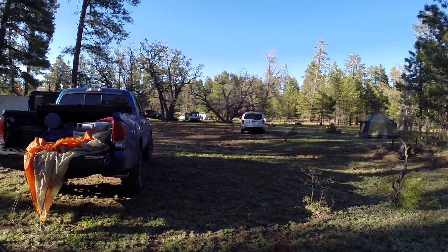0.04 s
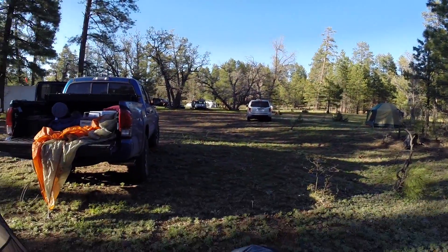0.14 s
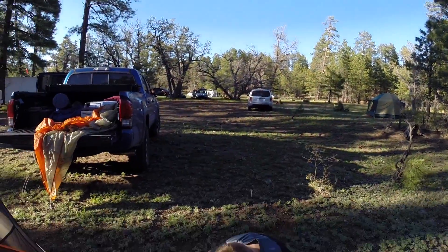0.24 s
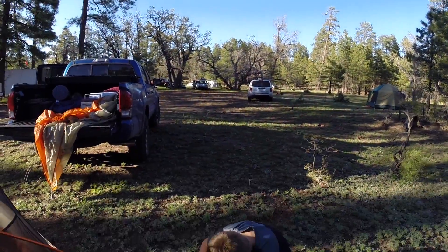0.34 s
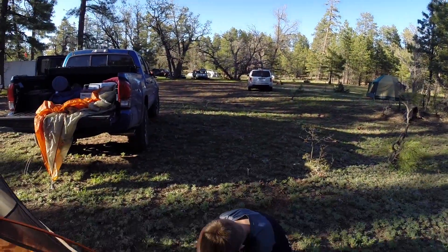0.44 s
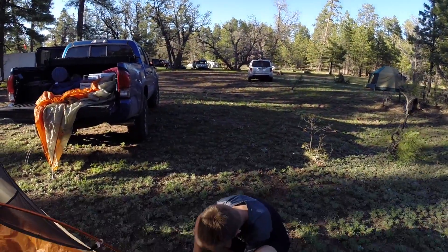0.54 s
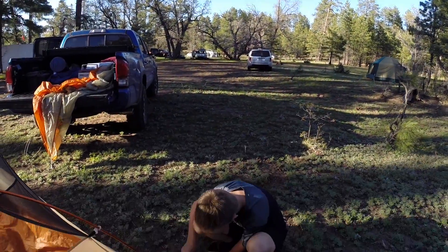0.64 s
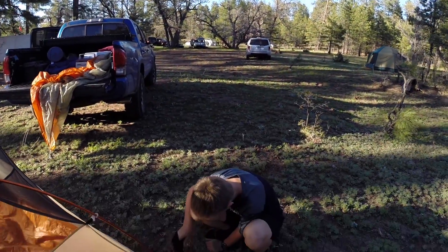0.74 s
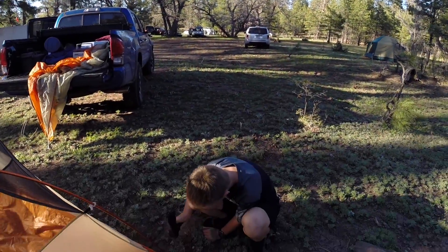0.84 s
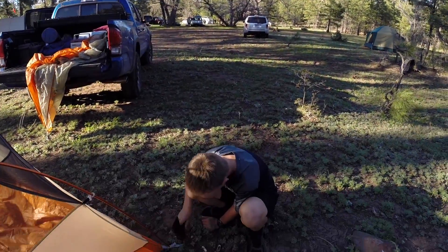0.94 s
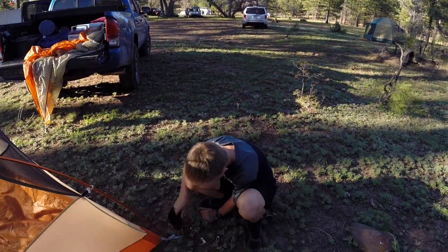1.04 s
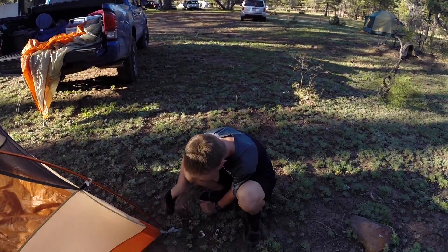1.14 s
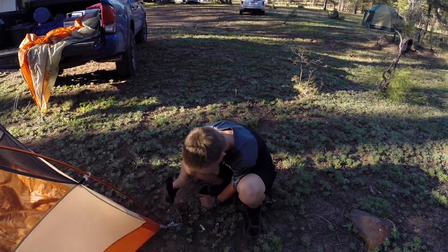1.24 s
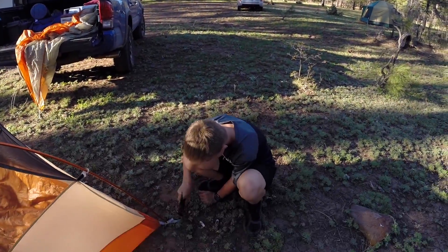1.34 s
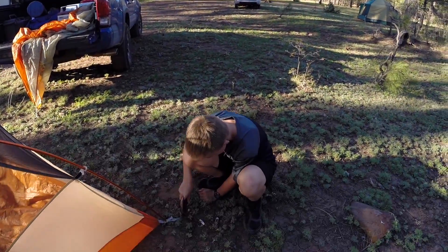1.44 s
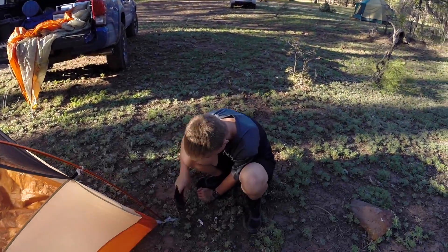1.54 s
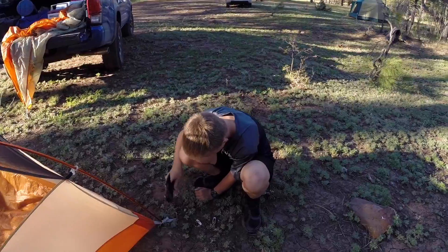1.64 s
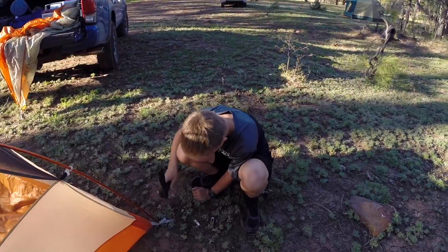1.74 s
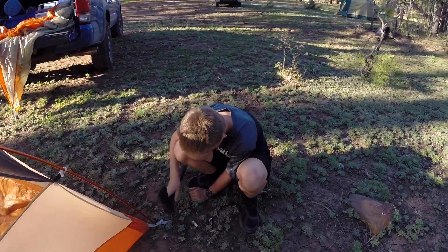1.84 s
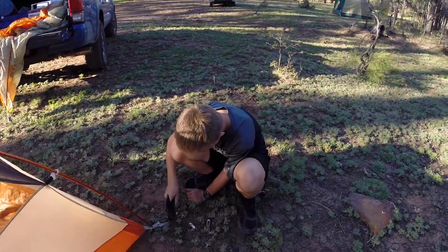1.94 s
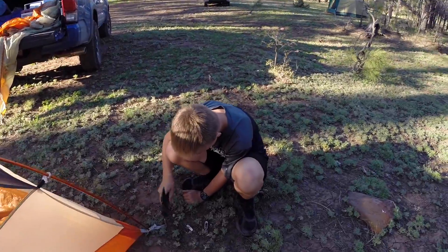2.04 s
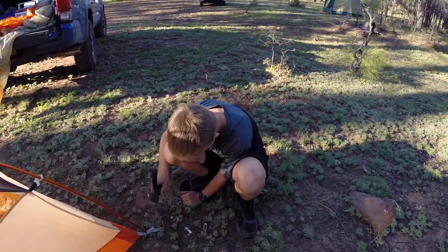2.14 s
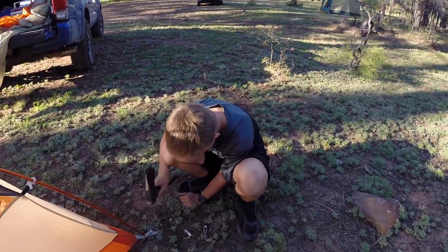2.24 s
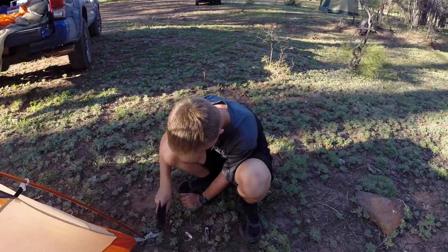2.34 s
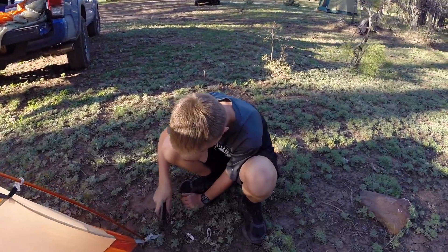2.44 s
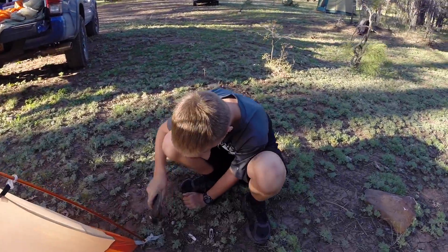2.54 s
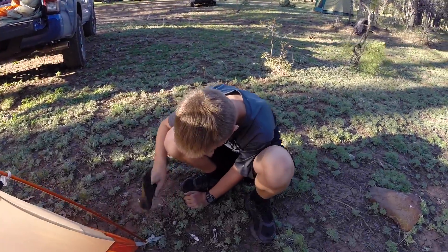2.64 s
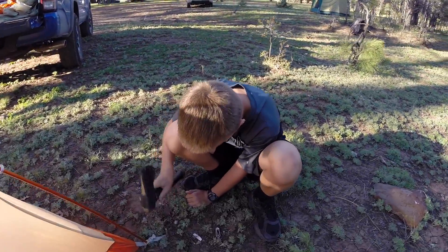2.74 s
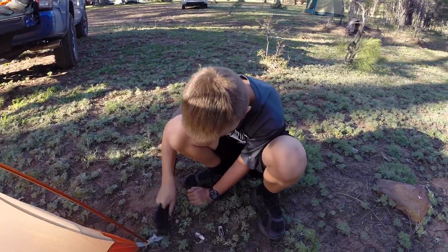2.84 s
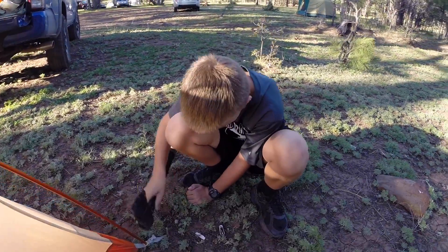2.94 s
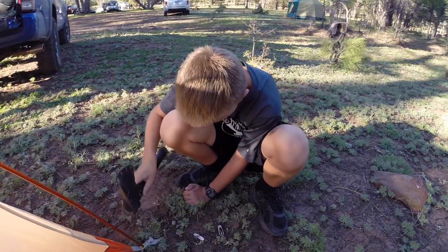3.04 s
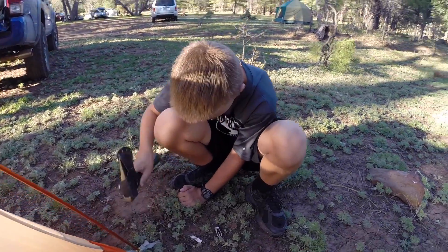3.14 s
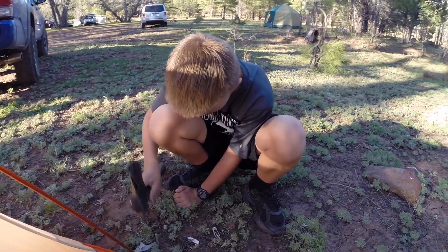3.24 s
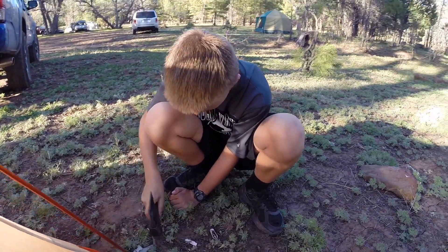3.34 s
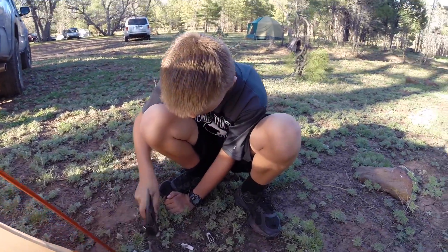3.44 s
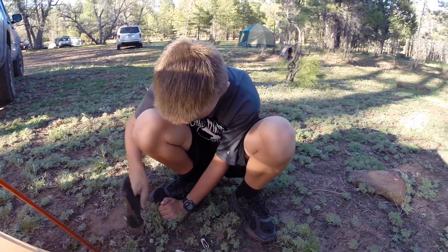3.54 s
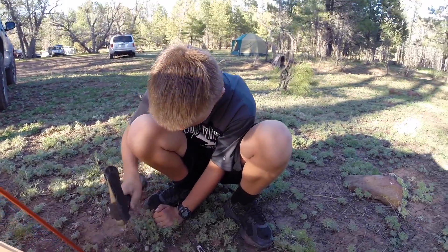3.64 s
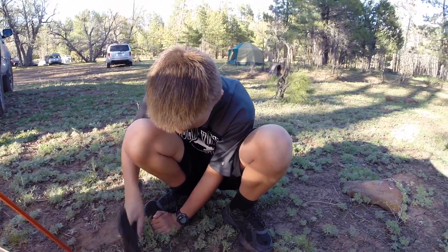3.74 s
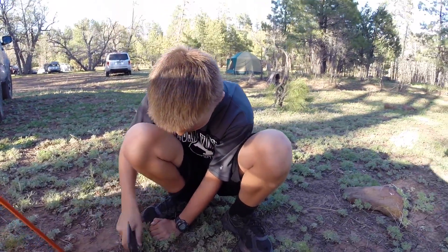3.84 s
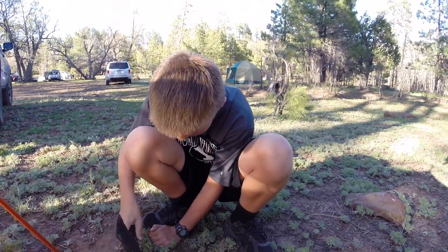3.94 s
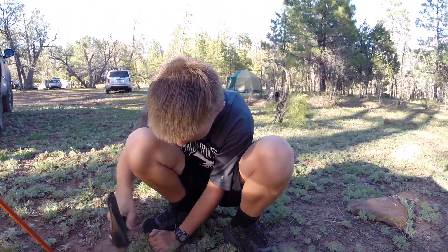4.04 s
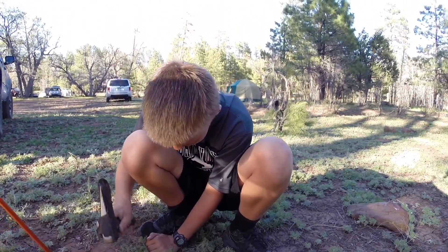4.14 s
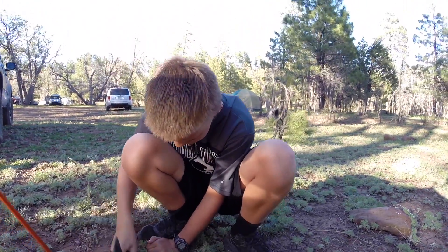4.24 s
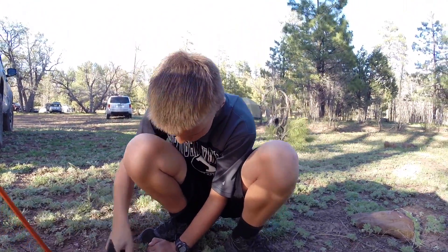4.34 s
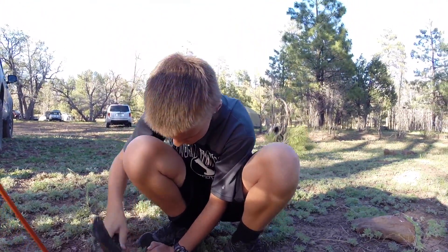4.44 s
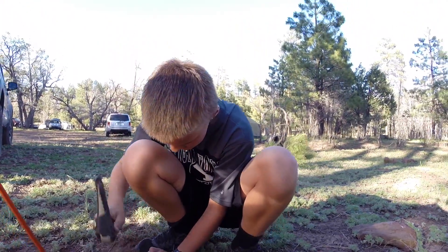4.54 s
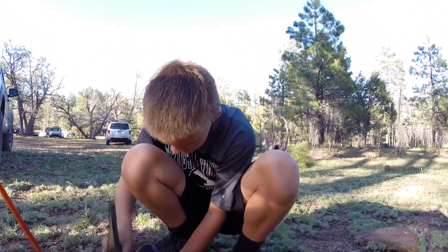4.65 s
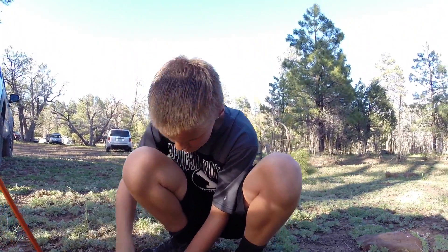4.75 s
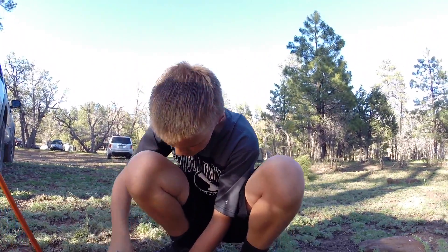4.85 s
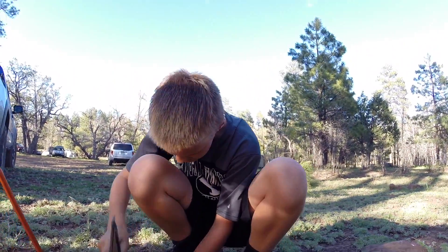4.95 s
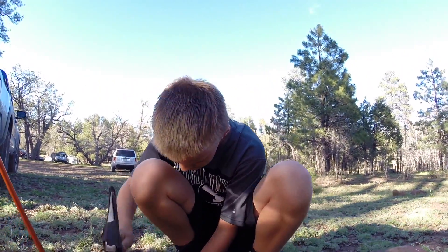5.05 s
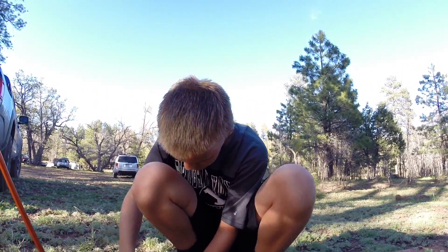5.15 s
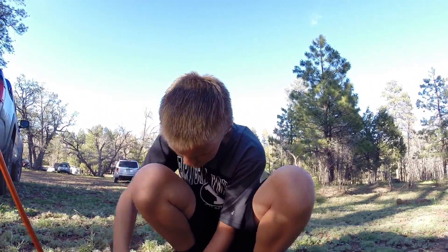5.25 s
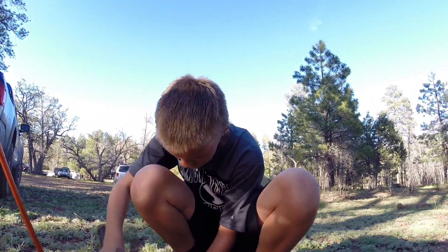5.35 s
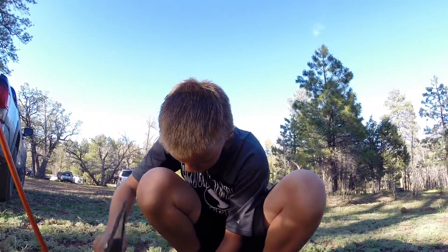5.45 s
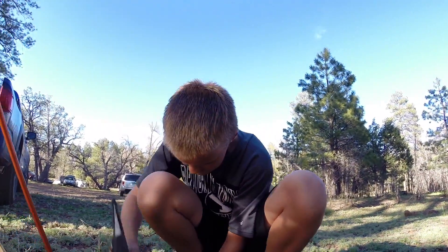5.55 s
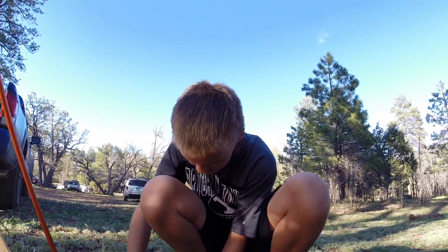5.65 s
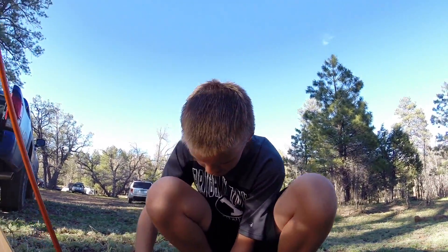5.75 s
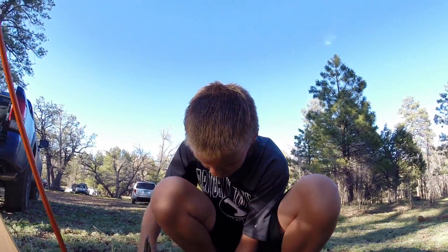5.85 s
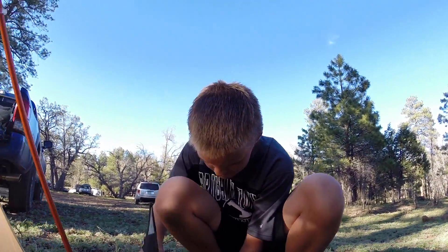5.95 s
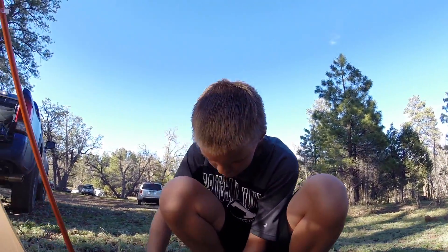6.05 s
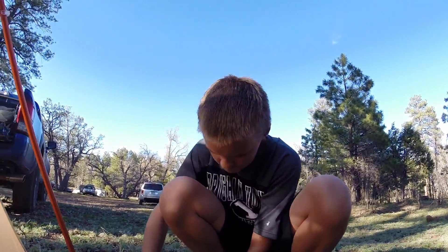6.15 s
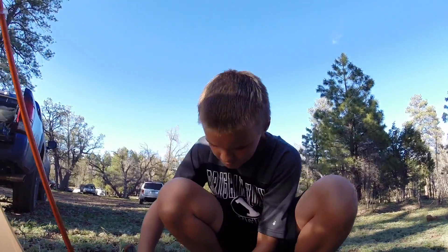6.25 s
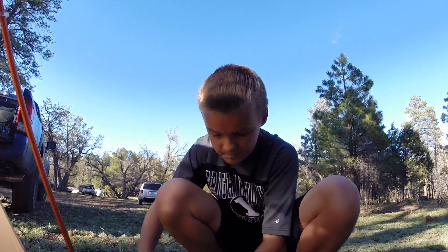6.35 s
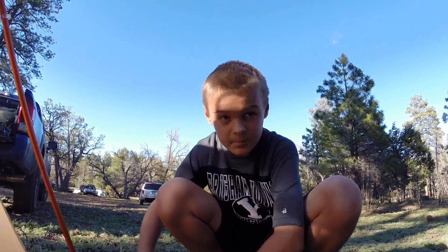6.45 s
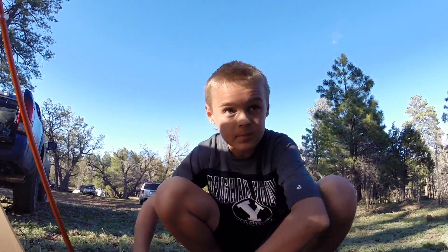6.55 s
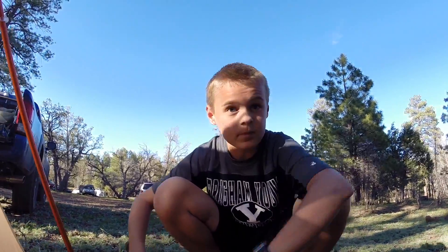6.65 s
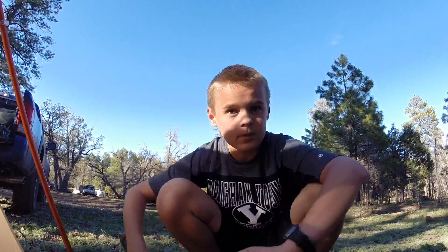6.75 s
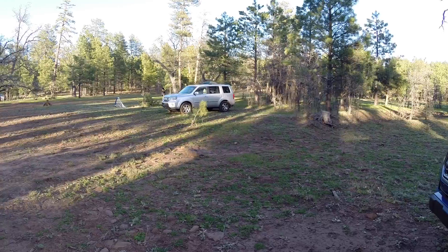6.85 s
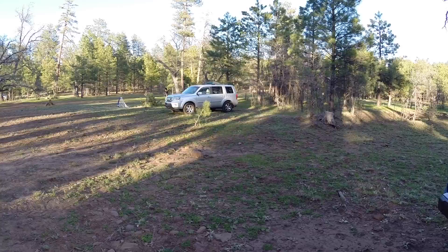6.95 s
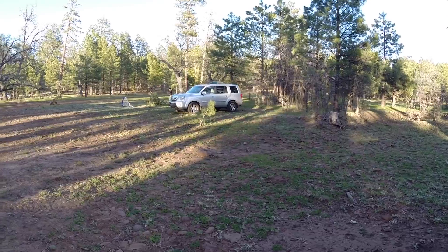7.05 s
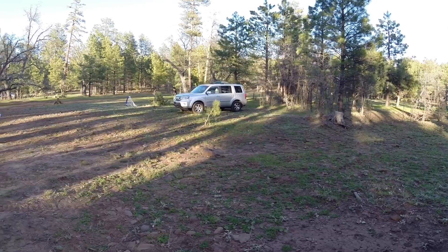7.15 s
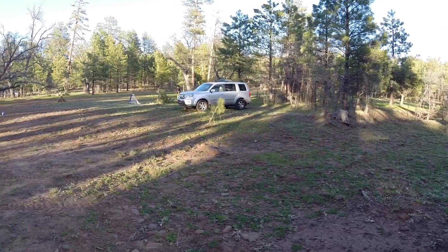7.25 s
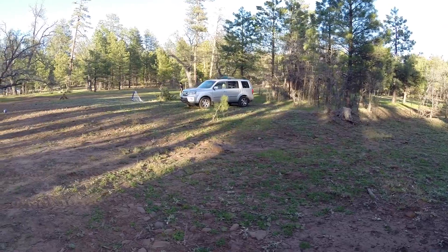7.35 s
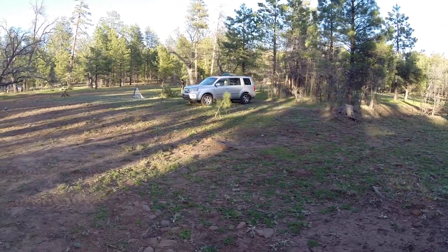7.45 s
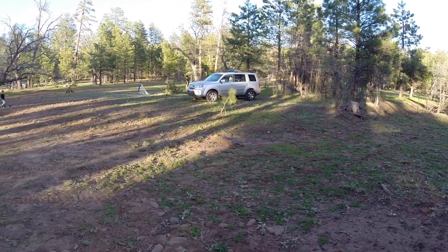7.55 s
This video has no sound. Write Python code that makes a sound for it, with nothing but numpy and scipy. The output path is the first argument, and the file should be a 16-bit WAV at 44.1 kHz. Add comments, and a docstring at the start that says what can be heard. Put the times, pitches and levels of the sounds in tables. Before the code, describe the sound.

Close to the microphone, a steel hatchet head taps a metal tent stake into hard ground about twice a second, then more slowly and harder. Each hit is a short bright clink choked by soil, with grit and a low thud. Pebbles click and feet scuff between blows. Two blows crunch in gravel. The sound almost vanishes for an instant, then dull bumps and faint bird twitters follow in open forest air.

```python
"""A metal tent stake is hammered into hard ground with the back of a hatchet at a forest campsite.
Each blow is a short clink of dying tones, choked by the soil, over crackling noise and a low thud.
Some blows bounce, and two land in the gravel as bursts of noise. Shaped noise makes the feet shuffling
on dirt, the clicking pebbles and the air in the trees; gliding pure tones make the far birds.
Late on, the sound nearly vanishes for an instant; dull bumps of low, dying tones follow."""
import sys
import numpy as np
from scipy import signal
from scipy.fft import rfft, irfft
from scipy.io import wavfile
from scipy.ndimage import uniform_filter1d

SR = 44100
rng = np.random.default_rng(int(sys.argv[2]) if len(sys.argv) > 2 else 0)


def to_wav(s):
    """Save 16-bit WAV."""
    ch = np.atleast_2d(s).T  # columns
    pcm = np.round(np.clip(ch, -1, 1) * 32767)  # PCM
    wavfile.write(sys.argv[1], SR, pcm.astype(np.int16))


N = 335160
T = np.arange(SR // 3) / SR  # time since a short sound began [s]

# blows on the stake, generally growing stronger;
# strength, stake tone and tick columns, all in dB, adjust the part levels
# (time [s], strength [dB], soil knock pitch [Hz], lowest stake tone [dB], upper stake tones [dB],
#  centre of the upper tones [Hz], contact tick [dB])
STAKE_BLOWS = [(0.0775, -9, 245, -5.5, -4, 5800, -1.5), (0.4194, -8, 264, -23, -15, 6300, -6),
               (0.7568, -8.5, 267, -8.5, 0.5, 5240, 0), (1.1526, -8, 259, 2, 7, 5370, 5.5),
               (1.5373, -8, 198, -13, -3, 3950, 2), (2.0661, -3.5, 233, -2.5, -3, 5270, -6.5),
               (2.539, -2.5, 207, -19, -13, 6300, 0), (3.5052, -1, 212, 1, -3.5, 4330, 3),
               (3.9666, 0, 224, -1, -0.5, 5000, -0.5), (4.4424, -1.5, 267, 4.5, 0.5, 4870, 1),
               (4.8953, 0, 209, -4.5, -3, 4700, -2), (5.3574, 0.5, 214, -7, -3, 4220, 1.5),
               (5.8307, 1.5, 230, -13.5, -12.5, 4280, -0.5)]
# blows that land in the gravel
# (time [s], soil thump [dB], crunch [dB], crunch pitch [Hz], lowest stake tone [dB])
GRAVEL_BLOWS = [(3.0154, -42.5, -36.5, 1890, -61.5), (6.2678, -20, -30, 927, -33.5)]
# the hatchet drops back after a blow (time [s], soil knock [dB], grit [dB], lowest stake tone [dB])
HATCHET_BOUNCES = [(1.5726, -43, -46, -65), (4.4999, -30.5, -42.5, -48), (4.9841, -35, -47, -77),
                   (5.4029, -30, -41, -76)]
# the clearest clicks: pebbles, and the hatchet rattling at the top of its backswing # about 0.11 s before the
# blows at 4.90, 5.36 and 6.27 s (time [s], level [dB], pitch [Hz])
CLEAR_CLICKS = [(1.0808, -64, 4300), (1.914, -56, 1490), (2.1248, -48.5, 885), (2.1575, -53.5, 990),
                (2.233, -55, 1140), (2.3498, -49, 990), (2.4126, -52.5, 902), (4.0912, -56.5, 2080),
                (4.783, -50.5, 1900), (5.2508, -43.5, 1910), (5.882, -55, 990), (6.1595, -45.5, 1960),
                (6.4418, -54.5, 1430), (6.53, -60.5, 3000)]
# scuffs of shoes, clothes and hatchet on the dirt; t60 is the time to fade by 60 dB
# (time [s], level before flutter [dB], rise [s], t60 [s], centre [Hz], width [octaves])
DIRT_SCUFFS = [(2.31, -52, 0.011, 0.66, 870, 0.83), (2.782, -42.5, 0.0054, 0.23, 870, 1.2),
               (2.798, -58.5, 0.026, 1, 2350, 1.3), (3.06, -54, 0.036, 0.37, 800, 0.89),
               (6.372, -52, 0.0051, 0.16, 9260, .08), (6.376, -50.5, 0.0021, 0.22, 2780, 4.4),
               (6.768, -51.5, 0.033, 0.15, 4640, 0.33), (6.765, -50, 0.028, 0.2, 1850, 2.5),
               (7.15, -61, 0.065, 0.62, 700, 1.5)]
# ringing tones of the stake before the soil grips it, lowest first (pitch [Hz], relative level [dB], t60 [s])
STAKE_TONES = [(3467, 0, 0.023), (4000, 5, 0.0091), (4253, 3.5, 0.0065), (4610, -8, 0.008),
               (5030, -1.5, 0.012), (5420, 1, 0.0061), (5980, 3, 0.011), (6090, -20, 0.0053),
               (8150, 12, 0.015)]
# soil under the stake (pitch [Hz], relative level [dB], t60 [s])
SOIL_THUMP = [(47.5, -19, 0.45), (117.8, 2.5, 0.035)]
# soil under the hatchet's head (pitch [Hz], relative level [dB], t60 [s])
HEAD_THUMP = [(52.7, -20, 0.098), (124, 4.5, 0.029), (160, 1.5, 0.033), (243, -6, 0.042), (380, -10, 0.032)]
# colour of the grit around the shaft (frequency [Hz], relative level per Hz [dB])
GRIT_COLOUR = [(150, 1), (330, 5.5), (420, 6.5), (560, 8), (780, 4.5), (1030, 3), (1500, -2.5), (2400, -12),
               (6000, -14), (15000, -49)]
# colour of softer grit (frequency [Hz], relative level per Hz [dB])
SOFT_GRIT_COLOUR = [(100, 2.5), (600, 8), (1200, -7), (2200, -5), (4000, -21), (8000, -31.5), (16000, -46)]
# colour of the steel contact tick (frequency [Hz], relative level per Hz [dB])
TICK_COLOUR = [(1500, -7), (2800, -15.5), (4000, 1.5), (6500, -0.5), (9000, -9), (10200, -9.5),
               (12500, -7.5), (14500, -20.5), (16500, -21.5)]
# colour of the forest air (frequency [Hz], relative level per Hz [dB])
AIR_COLOUR = [(15, -36), (25, -4), (49, -2), (108, -3.5), (161, -7.5), (277, -11), (560, -14), (607, -14),
              (887, -16.5), (1610, -23.5), (2160, -24.5), (2840, -26.5), (5000, -30.5), (14000, -46),
              (16000, -45)]
# fading of the outdoor reflections (frequency [Hz], t60 [s])
SCATTER_FADE = [(60, 0.39), (250, 0.22), (1000, 0.18), (4000, 0.079), (14000, 0.061)]
# drift of the air before the near silence; small lifts are added (time [s], rush [dB], hiss [dB])
BREEZE_DRIFT = [(0.0, -56.5, -64.5), (0.41, -60, -67), (1.23, -62.5, -70), (2.44, -59.5, -66.5),
                (3.08, -57.5, -64), (3.26, -60, -65), (3.75, -62, -67.5), (4.85, -60.5, -63),
                (5.75, -62.5, -68), (6.7, -61.5, -65.5)]
# the near silence (start [s], end [s])
QUIET_SPAN = (6.888, 6.93)
# faint airy hissing (time [s], length [s], centre [Hz], level at the fullest [dB])
AIRY_WISPS = [(0.092, .9, 3750, -66.5), (0.101, .9, 6650, -72.5), (0.156, 0.69, 8850, -74.5),
              (1.507, 0.59, 3970, -68.5)]
# dull bumps, all raised further by one shared lift (time [s], relative level [dB], pitch [Hz], t60 [s])
DULL_BUMPS = [(6.376, -44, 59, 0.36), (6.935, -35.5, 74.5, 0.15), (6.979, -24.5, 75, 0.047),
              (7.029, -29, 54.7, 0.091), (7.12, -39.5, 60, 0.052)]
# a far bird's level whistles (time [s], pitch [Hz])
BIRD_WHISTLES = [(0.626, 1940), (0.763, 2460), (0.937, 2150)]
# another bird's twitters (start [s], end [s], typical starting pitch of the notes [Hz])
BIRD_TWITTERS = [(7.094, 7.16, 4230), (7.368, 7.571, 3830)]
# snaps underfoot, before each varies in size (pitch [Hz], smallest level [dB])
DRY_SNAPS = [(600, -71.5), (1050, -72.5), (1700, -72), (2900, -76)]

# part levels of a blow, before its own strength and columns are added [dB]
TICK_DB, CLACK_DB, STAKE_DB, GRIT_DB, THUMP_DB, KNOCK_DB = -35, -43.5, -30.5, -35, -28, -33
# growth with strength [dB per dB]: the deep thump grows fastest, the knock slowest
THUMP_GROWTH, KNOCK_GROWTH = 1.28, 0.46
# change per dB of stake ring [dB per dB]: a glancing blow clacks and knocks instead
CLACK_PER_RING, KNOCK_PER_RING = -0.18, -0.067
# the feet shift once: middle and half length [s]
SHIFT_S, SHIFT_HALF_S = 2.4, .7
# the steady rumble, and the air from the near silence on [dB]
RUMBLE_DB, LATE_RUSH_DB, LATE_HISS_DB = -56, -60, -69
# lifts added to the drifting rush and hiss [dB]
RUSH_LIFT_DB, HISS_LIFT_DB = .5, 0.1
WHISTLE_S, WHISTLE_DB = .072, -64.5
# twitter notes: average gap [s], length [s], fall as a share of pitch, level [dB]
NOTE_GAP_S, NOTE_S, NOTE_FALL, NOTE_DB = .037, .022, .1, -66
# small pebbles: resting click rate (shifting feet add up to 1), middle level [dB] and pitch [Hz]
SMALL_AT_REST, SMALL_DB, SMALL_HZ = 0.15, -64.5, 1800
EDGE_HZ = 15300  # treble limit


def gain_of(db):
    """Turns decibels into amplitude."""
    return 10 ** (np.asarray(db) / 20)


def read(points, hz):
    """Reads between a table's points, with pitch spaced roughly as the ear hears it."""
    f, value = np.transpose(points)
    return np.interp(np.log(hz + 1), np.log(f + 1), value)


def add(mix, s, sound):
    """Lays a sound into the mix at time s."""
    part = mix[max(round(s * SR), 0):][:len(sound)]
    part += sound[:len(part)]


def noise(spectrum, size, lo=0, hi=SR):
    """Noise of average (rms) level 1 with the given colour, kept between two edges in Hz."""
    hz = np.fft.rfftfreq(size, 1 / SR)
    white = rfft(rng.standard_normal(size))
    x = irfft(white * gain_of(read(spectrum, hz)) * (hz >= lo) * (hz < hi), size)
    return x / x.std()


def swell(t, rise, t60):
    """A loudness curve that rises softly, then dies away."""
    return (1 - np.exp(-(t / rise) ** 2)) * gain_of(-60 * t / t60)


def sized(x, db):
    """Gives a short sound the energy of 25 ms at this level."""
    return gain_of(db) * x / np.sqrt(np.sum(x ** 2) / (SR / 40) + 1e-20)


def ring(modes, rise, spread, scramble=0):
    """Dying tones; pitch shifts a little every time, and a rough contact scrambles where waves start."""
    out = np.zeros(len(T))
    for hz, db, t60 in modes:
        turns = hz * (1 + spread * rng.standard_normal()) * T + scramble * rng.random()
        out += gain_of(db) * swell(T, rise, t60) * np.sin(2 * np.pi * turns)
    return out


def burst(spectrum, rise, t60, tail_db, tail_t60):
    """A crack of noise, followed by a tail of crumbs that settle in clumps."""
    crumbs = np.sqrt(uniform_filter1d(rng.exponential(1, len(T)) ** 4, 40).clip(0) / 24)
    tail = gain_of(tail_db) * crumbs * swell(T, 2 * rise, tail_t60)
    return noise(spectrum, len(T)) * (swell(T, rise, t60) + tail)


def hump(hz, octaves, skirt_db):
    """Colour of one broad resonance with shallow skirts; the highest treble rolls off."""
    f = np.geomspace(60, SR / 2, 200)
    skirts = -skirt_db * np.log10(1 + (np.log2(f / hz) / octaves) ** 2)
    return np.column_stack([f, skirts - 8.3 * (f / 12000) ** 4])


def rebound(x, delay, share):
    """What was struck springs back and makes a second contact, a delayed copy."""
    return x + share * np.interp(T - delay, T, x, left=0)


def forest():
    """Soft air in the trees: a steady rumble under a rush and a hiss that drift in level."""
    s, rush_db, hiss_db = np.transpose(BREEZE_DRIFT)
    t = np.arange(N) / SR
    late = t > QUIET_SPAN[0]
    rumble = noise(AIR_COLOUR, N, 0, 350)
    rush = noise(AIR_COLOUR, N, 350, 2500)
    hiss = noise(AIR_COLOUR, N, 2500, SR)
    rush *= gain_of(np.where(late, LATE_RUSH_DB, np.interp(t, s, rush_db) + RUSH_LIFT_DB))
    hiss *= gain_of(np.where(late, LATE_HISS_DB, np.interp(t, s, hiss_db) + HISS_LIFT_DB))
    return gain_of(RUMBLE_DB) * rumble + rush + hiss


def clink(low_db, upper_db, centre_hz):
    """Where the head lands decides which upper tones ring; the soil grips the shaft and chokes them."""
    favoured = hump(centre_hz, octaves=0.091, skirt_db=19)
    upper = [(hz, db + read(favoured, hz), t60) for hz, db, t60 in STAKE_TONES[1:]]
    grip = 1 / (1 + (T / .012) ** 2)
    lowest = sized(grip * ring(STAKE_TONES[:1], rise=0.0015, spread=0.013), low_db)
    return lowest + sized(grip * ring(upper, rise=0.00047, spread=0.014, scramble=0.86), upper_db)


def hammering():
    """Steel meets steel: a chattering tick, the head's clack, the choked stake, grit and soil thud."""
    out = np.zeros(N)
    for s, strength_db, knock_hz, ring_db, upper_db, centre_hz, tick_db in STAKE_BLOWS:
        tick = burst(TICK_COLOUR, rise=0.00074, t60=0.0075, tail_db=-21.0, tail_t60=0.028)
        tick = rebound(tick, delay=0.0011, share=1.0)
        clack_colour = hump(2290, octaves=0.23, skirt_db=14.0)
        clack = burst(clack_colour, rise=0.0002, t60=0.014, tail_db=-21, tail_t60=0.081)
        head = sized(tick, TICK_DB + tick_db) + sized(clack, CLACK_DB + CLACK_PER_RING * ring_db)

        grit = burst(GRIT_COLOUR, rise=0.00026, t60=0.015, tail_db=-9.5, tail_t60=0.083)
        stake = gain_of(STAKE_DB) * clink(ring_db, upper_db, centre_hz) + sized(grit, GRIT_DB)

        thump = rebound(ring(SOIL_THUMP, rise=0.00062, spread=0.018), delay=0.0076, share=0.31)
        knock = ring([(knock_hz, 0, .028)], rise=0.0057, spread=0.06)
        knock = rebound(knock, delay=0.00937, share=0.13)
        soil = sized(thump, THUMP_DB + THUMP_GROWTH * strength_db)
        soil += sized(knock, KNOCK_DB + KNOCK_GROWTH * strength_db + KNOCK_PER_RING * ring_db)
        add(out, s, gain_of(strength_db) * (head + stake) + soil)
    return out


def scatter(x):
    """Reflections from tent, vehicle and trees: random sparse echoes whose treble dies first."""
    taps = rng.standard_normal(SR // 2) * (rng.random(SR // 2) < 2500 / SR)  # about 2500 echoes per second
    hz, t, z = signal.stft(taps, SR, nperseg=256)
    fade = gain_of(-60 * t / read(SCATTER_FADE, hz)[:, None])
    tail = signal.istft(z * fade, SR, nperseg=256)[1]
    tail *= 1 - np.exp(-(np.arange(len(tail)) / SR / 0.0057) ** 4)  # hold back the first few ms
    return signal.fftconvolve(x, tail / np.linalg.norm(tail))[:N]


def shifting(t):
    """How much the feet are moving, 0-1."""
    return np.exp(-((t - SHIFT_S) / SHIFT_HALF_S) ** 2)


def crackle():
    """Dry needles and crumbs snap underfoot as tiny dying tones, most while the feet shift."""
    moving = shifting(np.arange(N) / SR)
    out = np.zeros(N)
    for hz, db in DRY_SNAPS:
        sizes = gain_of(3 * np.minimum(rng.exponential(1, N), 3))
        snaps = (rng.random(N) < (5 + 60 * moving) / SR) * sizes  # 5 to 65 snaps per second
        snap = sized(ring([(hz, 0, 4 / hz)], rise=0.00024, spread=.02), db)
        out += signal.oaconvolve(snaps, snap)[:N]
    return out


def wisps():
    """Narrow bands of hiss that swell and fade."""
    out = np.zeros(N)
    for s, length, hz, db in AIRY_WISPS:
        fade = np.hanning(round(length * SR))
        hiss = noise(hump(hz, octaves=0.13, skirt_db=21), N)[:len(fade)]
        add(out, s, gain_of(db) * fade * hiss)
    return out


def note(length, hz, fall):
    """A pure bird note that bends down by a share of its pitch."""
    u = np.linspace(0, 1, round(length * SR))
    turns = np.cumsum(hz * (1 - fall * u ** 2)) / SR
    return np.sin(np.pi * u) * np.sin(2 * np.pi * turns)


def birds():
    """A few level whistles, then twitters of short notes that bend downward."""
    out = np.zeros(N)
    for s, hz in BIRD_WHISTLES:
        add(out, s, gain_of(WHISTLE_DB) * note(WHISTLE_S, hz, 0))
    for start, end, hz in BIRD_TWITTERS:
        for s in np.arange(start, end, NOTE_GAP_S):
            late, sharp = rng.standard_normal(2)  # uneven timing and pitch
            tweet = note(NOTE_S, hz * (1 + 0.044 * sharp), NOTE_FALL)
            add(out, s + 0.0071 * late, gain_of(NOTE_DB) * tweet)
    return out


def pebble(db, hz):
    """One hard little click, of stone on stone or a rattling hatchet, with a faint knock on the soil."""
    click = burst(hump(hz, octaves=0.7, skirt_db=38), rise=0.00052, t60=0.012, tail_db=-33.5, tail_t60=.05)
    soil = ring([(710, 0, 0.013)], rise=.0005, spread=0.086)
    return sized(click, db) + sized(soil, db - 11.5)


def small_pebbles(count=14):
    """Small stones click at random, most while the feet shift."""
    t = np.arange(N) / SR
    due = np.cumsum(SMALL_AT_REST + shifting(t))  # clicks crowd where this climbs fastest
    out = np.zeros(N)
    for k, (when, size, pitch) in enumerate(rng.random((count, 3))):
        s = np.interp((k + when) / count, due / due[-1], t)
        add(out, s, pebble(SMALL_DB + 6 * (size - .5), SMALL_HZ * 2 ** (1.5 * (pitch - .5))))
    return out


def dirt():
    """Pebbles knock together and the hatchet rattles on its backswing; soles and steel drag over grainy soil as
    fluttering noise."""
    out = np.zeros(N)
    for s, db, hz in CLEAR_CLICKS:
        add(out, s, pebble(db, hz))
    t = np.arange(SR) / SR
    for s, db, rise, t60, hz, octaves in DIRT_SCUFFS:
        grains = uniform_filter1d(rng.standard_normal(SR), 150)
        flutter_db = 3.7 * grains / grains.std()
        stroke = swell(t, rise, t60)
        drag = noise(hump(hz, octaves, skirt_db=45.0), SR)
        add(out, s, gain_of(db + flutter_db) * stroke / stroke.max() * drag)
    return out


def bounces():
    """The head falls back softly: mostly soil, a faint tick, little metal."""
    out = np.zeros(N)
    for s, knock_db, grit_db, low_db in HATCHET_BOUNCES:
        knock = sized(ring([(202, 0, 0.022)], rise=0.0016, spread=0.017), knock_db)
        grit = burst(SOFT_GRIT_COLOUR, rise=0.00053, t60=.028, tail_db=-29, tail_t60=0.055)
        tick_colour = hump(3200, octaves=1.34, skirt_db=28)
        tick = burst(tick_colour, rise=0.00036, t60=0.0076, tail_db=-16, tail_t60=0.12)
        metal = sized(ring(STAKE_TONES[:1], rise=0.0011, spread=0.0043), low_db)
        add(out, s, knock + sized(grit, grit_db) + sized(tick, grit_db - 18.5) + metal)
    return out


def misses():
    """The head sinks into gravel: a crack, stones that ring and give way in two steps, a slow deep thump."""
    out = np.zeros(N)
    for s, thump_db, crunch_db, crunch_hz, low_db in GRAVEL_BLOWS:
        crack_colour = hump(2 * crunch_hz, octaves=2.7, skirt_db=35)
        crack = sized(burst(crack_colour, rise=.0001, t60=0.0024, tail_db=-32, tail_t60=0.022), -45.5)
        stone_colour = hump(crunch_hz, octaves=2.22, skirt_db=38.5)
        stones = burst(stone_colour, rise=0.00031, t60=0.021, tail_db=-14, tail_t60=0.11)
        stones = rebound(sized(stones, crunch_db), delay=0.0096, share=0.34)
        struck = sized(ring([(crunch_hz, 0, .025)], rise=0.00092, spread=.005), crunch_db - 4)
        earth = burst(SOFT_GRIT_COLOUR, rise=0.0044, t60=0.035, tail_db=-16, tail_t60=0.052)
        thump = sized(ring(HEAD_THUMP, rise=0.01, spread=0.012), thump_db)
        metal = sized(ring(STAKE_TONES[:1], rise=0.0038, spread=.005), low_db)
        add(out, s, crack + stones + struck + sized(earth, crunch_db - 6) + thump + metal)
    return out


def bumps():
    """Dull bumps that wobble briefly: a low tone with one near double and one at half its pitch."""
    out = np.zeros(N)
    for s, db, hz, t60 in DULL_BUMPS:
        tones = [(hz, 0, t60), (1.95 * hz, -6, t60 / 2), (.5 * hz, -7, t60)]
        add(out, s, gain_of(db + 8.5) * ring(tones, rise=0.0045, spread=0.025))
    return out


def scene():
    """The work on the ground, its faint reflections, and the forest around it."""
    work = hammering() + misses() + bounces() + dirt() + small_pebbles() + crackle()
    around = forest() + wisps() + bumps() + birds()
    return (work + gain_of(-24.5) * scatter(work) + around)[None]


def record(dry):
    """The level drops by 40 dB for an instant; a filter removes the highest treble throughout."""
    t = np.arange(N) / SR
    quiet = 1. * ((t > QUIET_SPAN[0]) & (t < QUIET_SPAN[1]))
    muted = uniform_filter1d(quiet, 200)  # soften the edges
    treble_limit = signal.firwin(255, EDGE_HZ, window=("kaiser", 9), fs=SR)
    return signal.oaconvolve(dry * gain_of(-40 * muted), treble_limit[None], "same")


dry = scene()
out = record(dry)
to_wav(out)
```